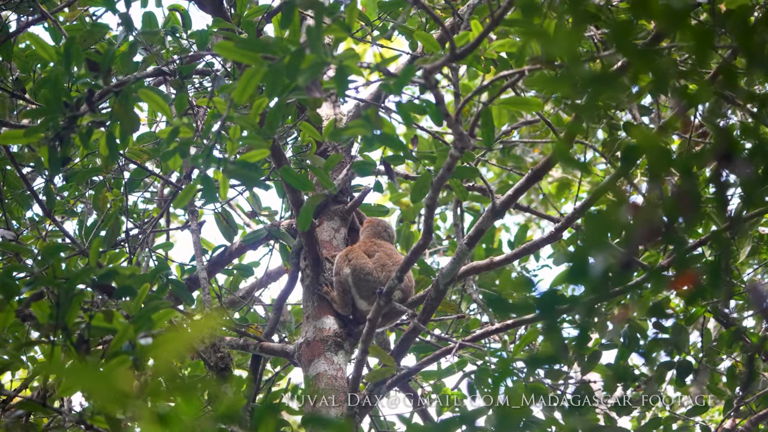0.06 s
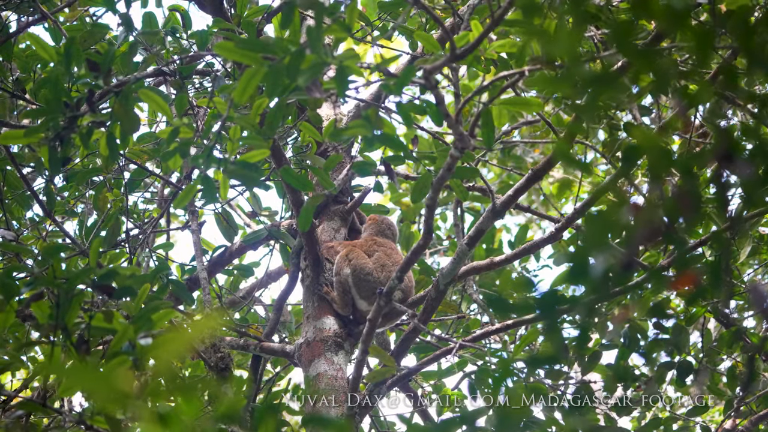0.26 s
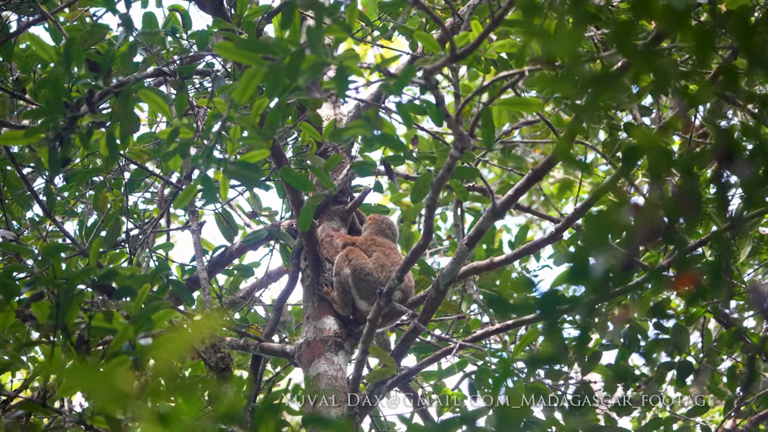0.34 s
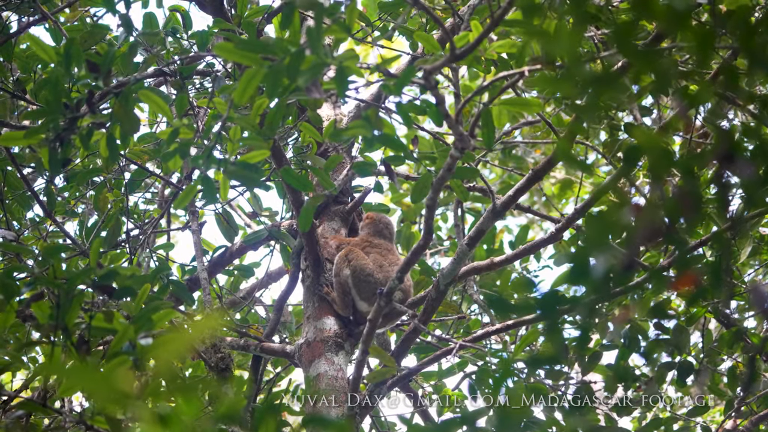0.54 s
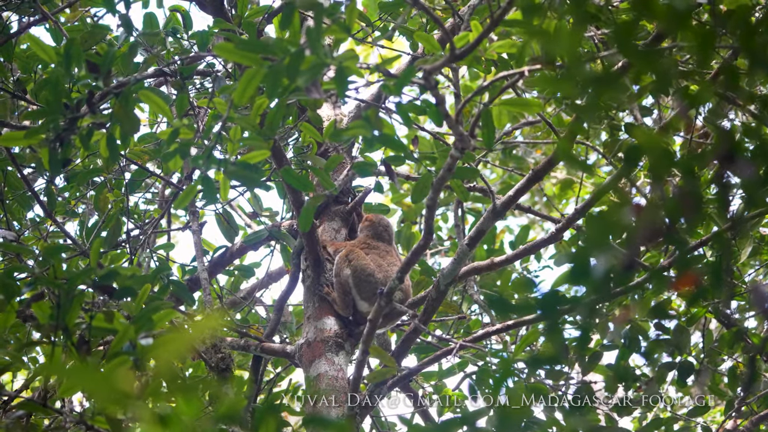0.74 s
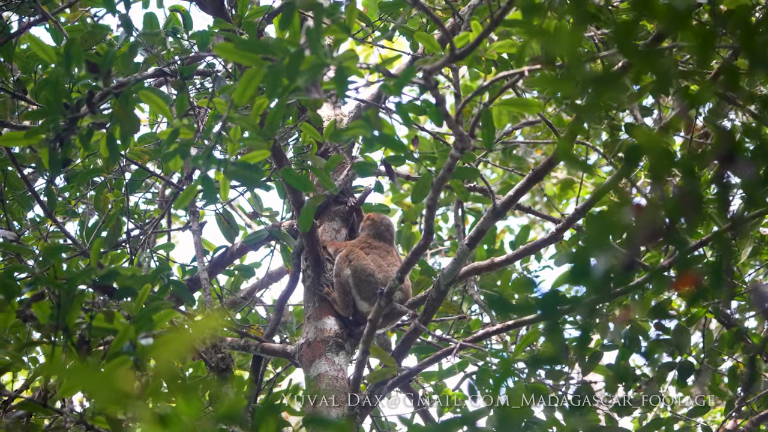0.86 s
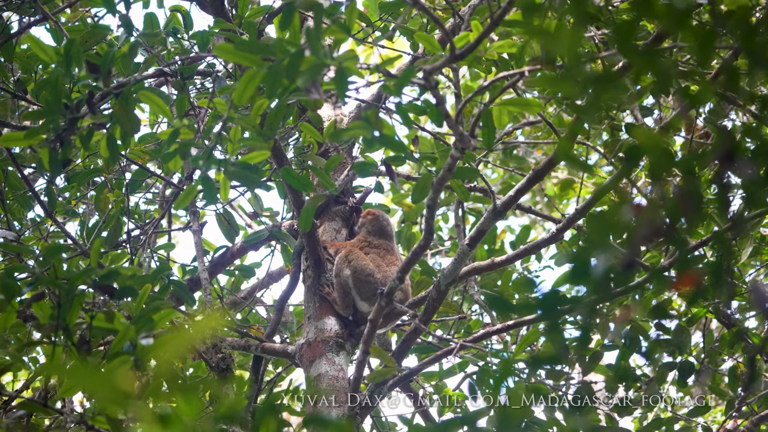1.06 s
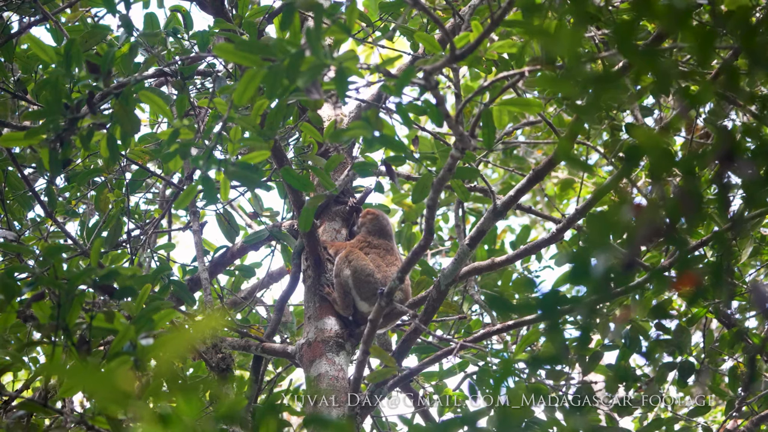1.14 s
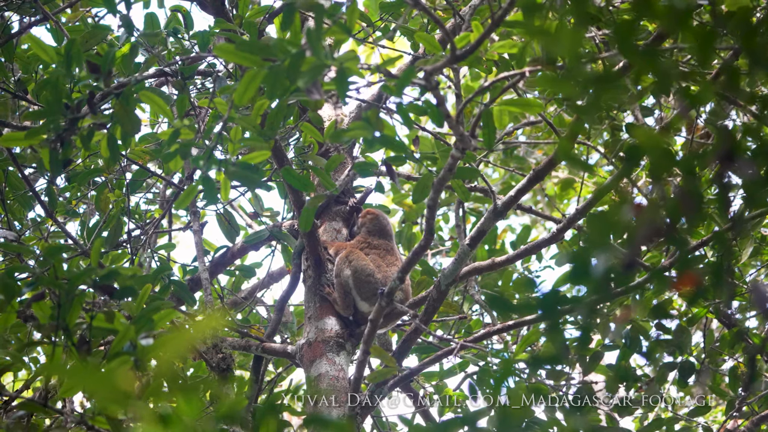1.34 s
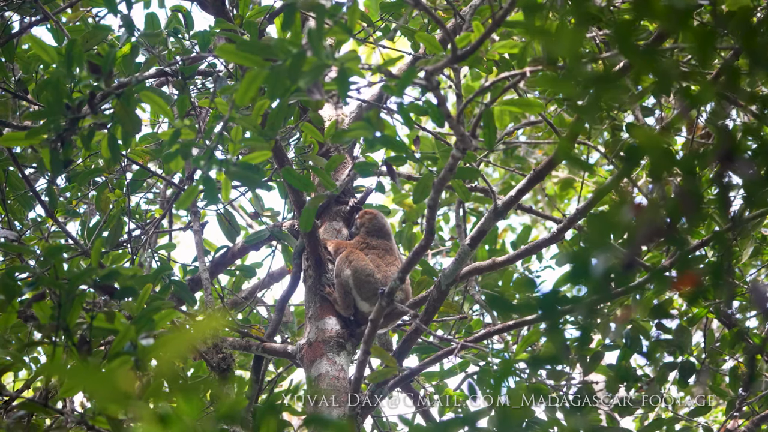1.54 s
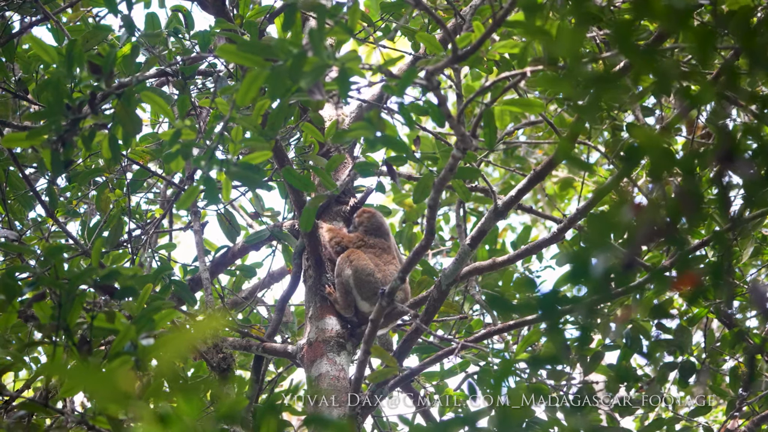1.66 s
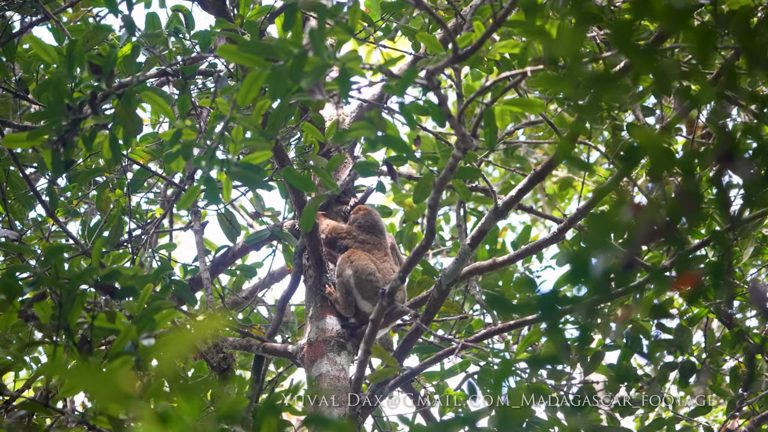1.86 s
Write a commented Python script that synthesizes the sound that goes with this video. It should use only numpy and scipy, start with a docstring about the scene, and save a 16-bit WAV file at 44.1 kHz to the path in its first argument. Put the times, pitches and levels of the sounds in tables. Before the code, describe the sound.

A bird gives one piercing whistle close by at 0.2 seconds, cracking and ending on a higher squeak by 0.4. Distant slurred whistles follow. From about 1 second, thin drawn-out high notes overlap, and leaves brush softly three times until 1.5. A far bird pips rapidly from 1.3 to 1.9. Throughout, a soft rainforest rustle and droning insects continue, with a cricket chirping in fours twice a second.

```python
"""A soft rustle and droning insects all round a pair of microphones in a rainforest; a cricket chirps
in fours. Close by, a bird gives one piercing whistle that cracks and ends on a higher squeak.
Far birds whistle and pip, thin drawn-out notes overlap, and leaves brush briefly.
Near leaves and far trunks scatter the calls on their way to the microphones."""
import sys
import numpy as np
from scipy import signal
from scipy.fft import rfft, irfft
from scipy.io import wavfile

SR = 44100
rng = np.random.default_rng(int(sys.argv[2]) if len(sys.argv) > 2 else 0)


def pcm_store(signal):
    """Save signal as 16-bit PCM."""
    levels = np.round(np.clip(np.atleast_2d(signal), -1, 1) * 32767)
    wavfile.write(sys.argv[1], SR, levels.astype(np.int16).T)


N = 83790

# Bird partials as multiples of the written pitch, the second or the third harmonic of the voice
HALVES, THIRDS = (1, 3 / 2, 2), (2 / 3, 1, 4 / 3, 5 / 3, 2)


def undb(db):
    """Decibels to gain."""
    return 10 ** (np.asarray(db) / 20)


def unit(x):
    """Scale to rms 1."""
    return x / np.sqrt(np.mean(x ** 2))


def band(hz, width_hz):
    """Noise in a bell-shaped band."""
    f = np.fft.rfftfreq(N, 1 / SR)
    return unit(irfft(rfft(rng.standard_normal(N)) * np.exp(-2 * ((f - hz) / width_hz) ** 2), N))


def gate(start, length, attack_s, release_s):
    """Smooth attack, hold and release."""
    t = np.arange(N) / SR - start
    return np.sin(np.pi / 2 * np.clip(np.minimum(t / attack_s, (length - t) / release_s), 0, 1)) ** 2


def glide(start, length, pitches_hz):
    """Pitch sliding through evenly spaced points."""
    return np.interp(np.arange(N) / SR, np.linspace(start, start + length, len(pitches_hz)), pitches_hz)


def voice(hz, flutter, flutter_hz, partials=((1, 0),)):
    """A whistle whose pitch trembles by the share `flutter`; partials are (ratio, level_db)."""
    phase = 2 * np.pi * np.cumsum(hz * (1 + flutter * band(0, flutter_hz))) / SR
    return sum(undb(db) * np.sin(ratio * phase) for ratio, db in partials)


def trees(x, wet_db, pan_db=0, leaves_t60_s=0.36, trunks_t60_s=0.66, delay_s=0.007):
    """Direct sound plus quick scatter from near leaves and a long tail from far trunks."""
    t = np.arange(N) / SR
    decay = 0.66 * 1000 ** (-t / leaves_t60_s) + 0.34 * 1000 ** (-t / trunks_t60_s)
    echo = rng.standard_normal((2, N)) * decay * np.clip(t / delay_s - 1, 0, 1)
    echo /= np.sqrt(np.sum(echo ** 2, axis=1, keepdims=True))
    scattered = signal.fftconvolve(x[None], echo, axes=1)[:, :N]
    direct = x * undb(np.array([[pan_db], [-pan_db]]) / 2)
    return (direct + undb(wet_db) * scattered) / np.hypot(1, undb(wet_db))


def spaced_mics(x, lag_s):
    """The sound reaches the right microphone lag_s after the left."""
    f = np.fft.rfftfreq(N, 1 / SR)
    return np.array([x[0], irfft(rfft(x[1]) * np.exp(-2j * np.pi * f * lag_s), N)])


def forest_floor(level_db=-51.5, sway_db=0.48):
    """Diffuse rustle and rumble, alike at both microphones in the bass."""
    # Spectrum of the rustle: frequency_hz, relative_density_db
    spectrum = [(25, -2.5), (55, -1.5), (100, -8), (200, -6), (340, -2.5), (550, -7), (1400, -10.5),
                (2200, -9.5), (3300, -4.5), (4800, -13.5), (7000, -18.5), (10000, -24), (15000, -33)]
    # Likeness of left and right: frequency_hz, correlation
    likeness = [(40, 0.93), (125, 0.94), (250, 0.9), (500, 0.01), (8000, 0)]
    log_f = np.log(np.fft.rfftfreq(N, 1 / SR) + 1)

    def curve(table):
        hz, values = zip(*table)
        return np.interp(log_f, np.log(hz), values)

    colour, alike = undb(curve(spectrum)), curve(likeness)
    mid = irfft(rfft(rng.standard_normal(N)) * colour * np.sqrt(1 + alike), N)
    side = irfft(rfft(rng.standard_normal(N)) * colour * np.sqrt(1 - alike), N)
    return undb(level_db + sway_db * band(0, 8)) * unit(np.array([mid + side, mid - side]))


def far_insects():
    """Distant insects buzz in narrow or broad bands and take turns."""
    # Drones: start_s, length_s, centre_hz, width_hz, level_db
    drones = [(-.05, 0.3, 6450, 220, -58), (-.05, 0.46, 6110, 150, -62), (-.05, 0.314, 7850, 1400, -60),
              (0.073, .19, 2760, 1000, -53.5), (0.333, 0.4, 5740, 106, -61.5), (0.868, 0.4, 6100, 128, -67),
              (0.933, 0.363, 4000, 960, -56), (1.732, .25, 6470, 126, -55.5)]
    out = np.zeros((2, N))
    for start, length, hz, width, db in drones:
        buzz = np.array([band(hz, width), band(hz, width)])
        out += undb(db) * gate(start, length, attack_s=0.066, release_s=0.072) * buzz
    return out


def cricket(start_s=0.068, group_every_s=0.496, stroke_every_s=0.0335, stroke_s=0.023):
    """Short wing strokes, each sagging in pitch, in groups of four twice a second."""
    high_hz, low_hz, level_db = 6700, 6540, -51.5
    group_time = (np.arange(N) / SR - start_s) % group_every_s
    progress = np.clip(group_time % stroke_every_s / stroke_s, 0, 1)
    tone = voice(high_hz + (low_hz - high_hz) * progress, flutter=0.00205, flutter_hz=500)
    strokes = np.sin(np.pi * progress) * (group_time < 4 * stroke_every_s)
    return trees(undb(level_db) * strokes * tone, wet_db=-15)


def near_bird():
    """One loud call close by: a clean opening, a rough crack, a held whistle, a lift and a squeak."""
    # The five parts: start_s, length_s, start_hz, middle_hz, end_hz, flutter_share
    call = [(.2, .038, 6885, 6895, 6770, .0012), (.231, .034, 6550, 6280, 6080, .033),
            (.24, .094, 6880, 6892, 6920, .0016), (.32, .028, 6990, 7070, 7060, .005),
            (.329, .05, 8080, 7830, 7520, .021)]
    # Timbre of each part: level_db per partial
    opening_db = [-19.5, -50, -54]
    crack_db = [-41, -44, -59]
    hold_db = [-53, -25, -48, -61, -69]
    lift_db = [-45, -31.5, -58, -70, -74]
    squeak_db = [-40, -37, -57.5, -70]
    timbres = (zip(HALVES, opening_db), zip(HALVES, crack_db),
               zip(THIRDS, hold_db), zip(THIRDS, lift_db), zip(THIRDS, squeak_db))
    out = np.zeros(N)
    for (start, length, *pitches, flutter), partials in zip(call, timbres):
        tone = voice(glide(start, length, pitches), flutter, flutter_hz=930, partials=partials)
        out += gate(start, length, attack_s=0.012, release_s=0.012) * tone
    return spaced_mics(trees(out, wet_db=-1.5, pan_db=-0.5), lag_s=-25e-6)


def far_birds():
    """Slurred whistles, blurred by distance."""
    # Whistles, sung 1% below these pitches: start_s, length_s, start_hz, middle_hz, end_hz,
    # level_db, flutter_share
    calls = [(.44, 0.125, 2965, 2812, 2743, -48.5, .035), (.63, 0.063, 3650, 3400, 3270, -54, 0.011),
             (0.692, 0.21, 3654, 3676, 3760, -61.5, 0.0091), (1.254, 0.21, 3245, 3191, 3203, -47.5, 0.0075),
             (1.349, 0.14, 2400, 2300, 2280, -57, 0.018), (1.447, 0.0916, 2996, 2817, 2770, -48, 0.0121),
             (1.522, 0.098, 2850, 2912, 2880, -47, 0.0275), (1.617, 0.19, 3198, 3044, 3104, -48.5, 0.014),
             (1.723, 0.16, 2044, 2000, 1984, -57, 0.031), (1.776, 0.17, 2885, 2748, 2655, -49.5, 0.023)]
    out = np.zeros(N)
    for start, length, *pitches, db, flutter in calls:
        tone = voice(glide(start, length, pitches), flutter, flutter_hz=285, partials=[(0.99, 0.024)])
        out += undb(db) * gate(start, length, attack_s=0.014, release_s=0.039) * tone
    return trees(out, wet_db=1.5)


def long_notes(gain_db=3.5):
    """Thin, nearly level whistles that overlap among the trees."""
    # Drawn-out notes: start_s, length_s, start_hz, middle_hz, end_hz, relative_level_db
    notes = [(1.05, .17, 6130, 6060, 6110, -41.5), (1.066, .23, 6350, 6325, 6325, -46),
             (1.185, .06, 6290, 6200, 6270, -50), (1.32, .26, 6340, 6305, 6320, -46),
             (1.376, .075, 6610, 6570, 6520, -46), (1.43, .2, 6540, 6630, 6660, -45.5),
             (1.365, .27, 5820, 5790, 5790, -52), (1.45, .225, 5920, 5878, 5880, -46),
             (1.66, .3, 5872, 5872, 5878, -59.5)]
    # Their timbre: relative_level_db per partial
    partial_db = [2.5, -16.5, -30.5]
    out = np.zeros(N)
    for start, length, *pitches, db in notes:
        pitch = glide(start, length, pitches)
        tone = voice(pitch, flutter=0.0048, flutter_hz=240, partials=zip(HALVES, partial_db))
        out += undb(db + gain_db) * gate(start, length, attack_s=0.019, release_s=0.033) * tone
    return spaced_mics(trees(out, wet_db=0.5, pan_db=-0.5), lag_s=40e-6)


def leaves(centre_hz=2270, width_hz=1900, attack_s=0.0067):
    """Foliage brushes softly: noise that rises fast and dies away."""
    # Brushes: start_s, decay_s, level_db
    rustles = [(1.109, 0.085, -47.5), (1.328, 0.049, -53), (1.447, 0.021, -46.5)]
    t = np.arange(N) / SR
    swell = sum(undb(db) * np.clip((t - start) / attack_s, 0, 1) * np.exp(-np.abs(t - start) / decay)
                for start, decay, db in rustles)
    return swell * np.array([band(centre_hz, width_hz), band(centre_hz, width_hz)])


def far_pips(length_s=0.026, fall_hz=(3920, 3813)):
    """A distant bird gives a run of short falling pips."""
    # Pips: start_s, level_db
    pips = [(1.33, -50.5), (1.402, -51), (1.482, -49.5), (1.552, -55), (1.623, -49), (1.694, -49.5),
            (1.761, -51), (1.826, -50.5), (1.88, -42.5)]
    out = np.zeros(N)
    for start, db in pips:
        tone = voice(glide(start, length_s, fall_hz), flutter=0.0101, flutter_hz=298)
        out += undb(db) * gate(start, length_s, attack_s=0.008, release_s=0.012) * tone
    return trees(out, wet_db=2)


def scene():
    """Insects, birds and leaves over the forest floor."""
    return (forest_floor() + far_insects() + cricket() + near_bird()
            + far_birds() + long_notes() + leaves() + far_pips())


def record(dry, top_hz=15650):
    """The recorder cuts the highest treble steeply."""
    return signal.sosfilt(signal.ellip(10, 0.2, 80, top_hz, fs=SR, output="sos"), dry)


dry = scene()
out = record(dry)
pcm_store(out)
```